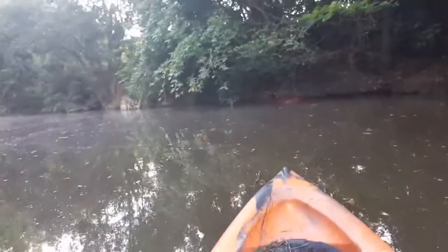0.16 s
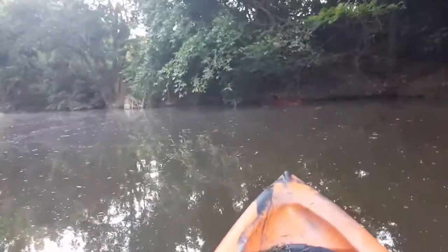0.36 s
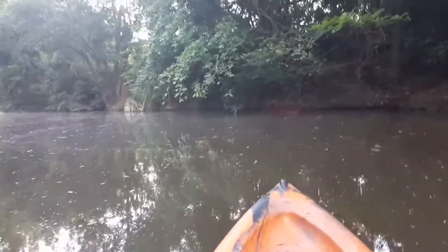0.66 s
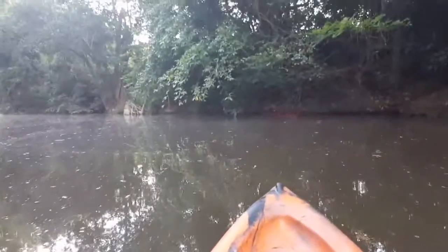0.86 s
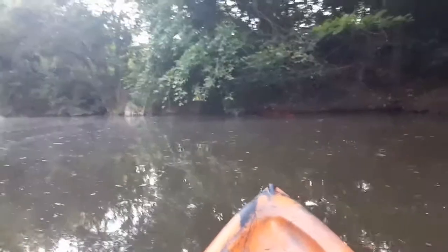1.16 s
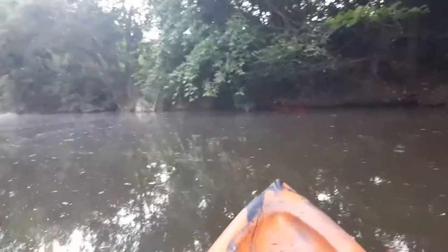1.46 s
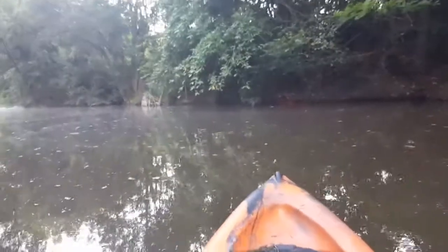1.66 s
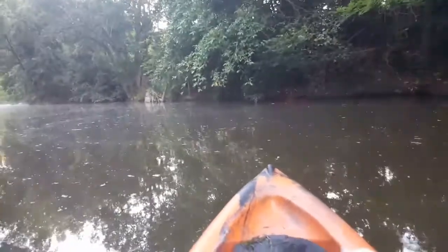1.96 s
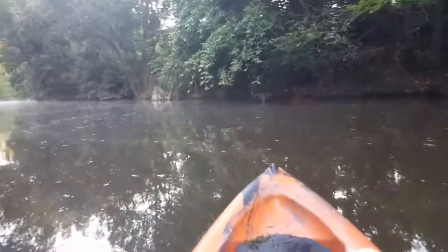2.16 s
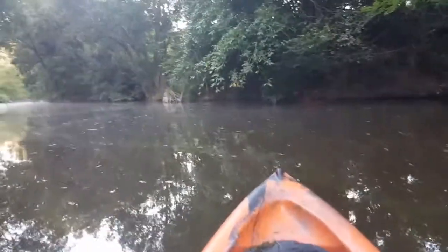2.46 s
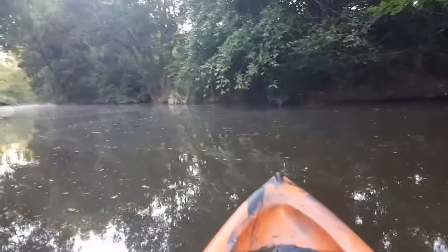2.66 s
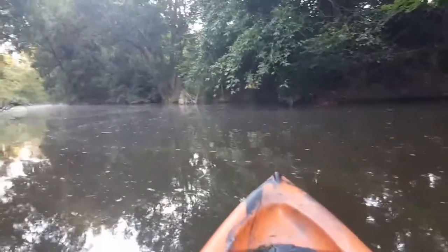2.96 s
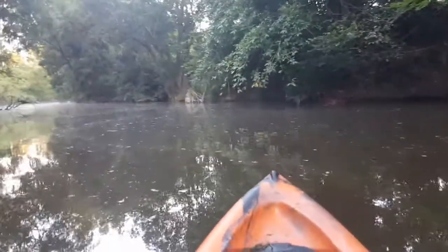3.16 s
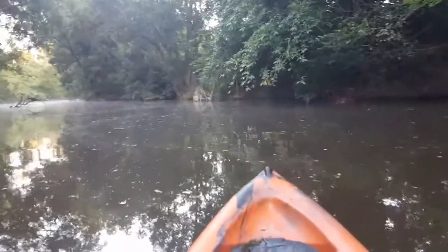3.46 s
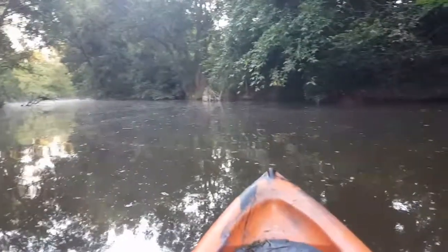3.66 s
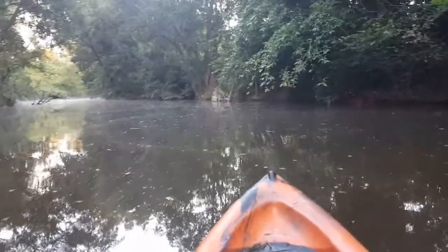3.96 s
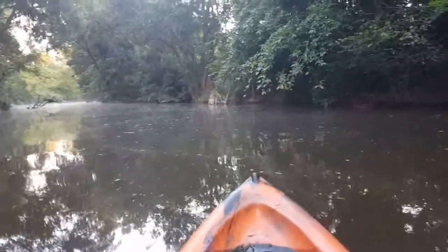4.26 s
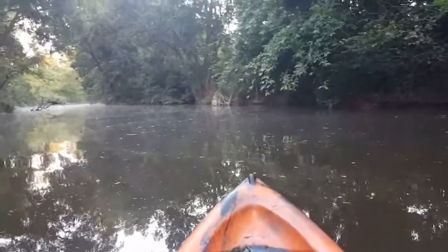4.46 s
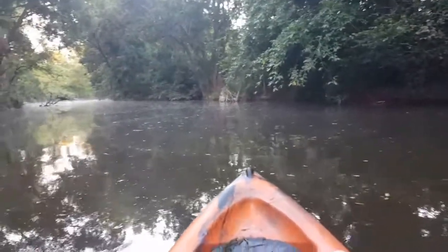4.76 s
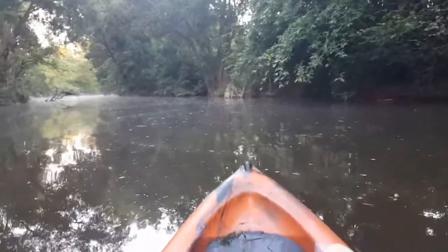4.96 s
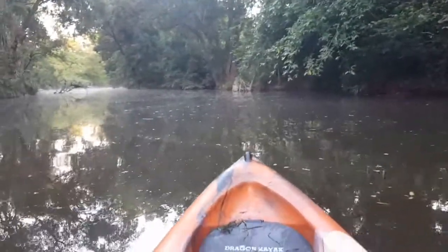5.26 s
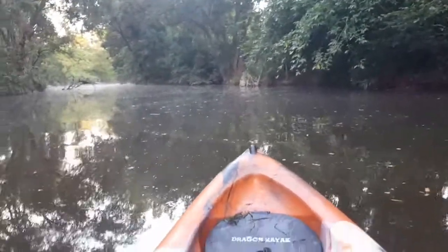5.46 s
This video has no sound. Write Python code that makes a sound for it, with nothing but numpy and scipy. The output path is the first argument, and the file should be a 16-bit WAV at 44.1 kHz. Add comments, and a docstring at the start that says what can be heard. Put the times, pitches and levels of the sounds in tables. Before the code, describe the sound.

A kayak paddle swishes softly through calm water three times, and drips tick and bubble off the lifted blade between strokes. Just before the second stroke, a drop hits the microphone with one loud pop on the left. Thin, distant bird whistles follow, and near the end the blade lightly slaps the surface. The water is close, with faint insects and a low, far rumble behind it.

```python
"""Kayak on a calm wooded river

The hull glides. Each paddle stroke swishes, then the lifted blade sheds drips that tick and bubble;
once it slaps the surface. Far rumble, insects and thin bird whistles fill the air.
One drop strikes the left microphone port with a loud pop."""
import sys
import numpy as np
from scipy import signal
from scipy.fft import rfft, irfft, next_fast_len
from scipy.io import wavfile
from scipy.ndimage import uniform_filter1d, map_coordinates

SR = 44100
rng = np.random.default_rng(int(sys.argv[2]) if len(sys.argv) > 2 else 0)


def log_audio(samples):
    """Write samples as a 16-bit WAV file to the path given in sys.argv[1]."""
    # one column per channel
    frames = np.atleast_2d(samples).T
    # limit to full scale, then quantise
    limited = np.clip(frames, -1, 1)
    pcm = np.round(limited * 32767).astype(np.int16)
    wavfile.write(sys.argv[1], SR, pcm)


N = 246953

# blade pulls: t at full strength/s, hold/s, swish/dB
PULLS = [(0.975, 0.25, -60.5), (2.57, 0.26, -55), (4.488, .13, -54)]
# water off the lifted blade: t at full strength/s, hold/s, swish/dB, spray/dB, hiss/dB
RUNOFF = [(0, 0.098, -58.5, -64.5, -67), (1.654, 0.054, -87, -74.5, -73), (3.027, 0.23, -72.5, -67.5, -72),
          (3.41, 0.025, -74, -67, -61.5), (3.484, 0.095, -77, -67, -72), (4.66, 0.064, -66, -74, -66.5),
          (4.817, 0.018, -58, -64, -60), (3.697, 0.13, -85, -75, -83), (4.05, 0.067, -71, -83, -82),
          (5.202, 0.026, -69, -78.5, -67.5)]
# swish spectrum: f/Hz, relative density/dB
SWISH_SPECTRUM = [(90, -16), (170, 7.5), (330, 0.5), (440, 3), (620, -3.5), (850, -2.5), (2000, -8.5),
                  (2700, -13.5), (3300, -26.5), (6500, -25), (8500, -25.5), (10000, -42.5), (15500, -36)]
# swish width: f/Hz, L-R correlation
SWISH_CORR = [(60, 0.91), (380, 1), (2380, -0.25), (15000, -0.0025)]
# swish position: f/Hz, pan/dB (pan is left minus right throughout)
SWISH_PAN = [(60, -18), (180, 1.5), (550, 0), (1650, 8.5), (4970, 6), (15000, 6)]
# drip bubbles: t/s, level/dB, f/Hz, life/cycles
BUBBLES = [(0.013, -47.5, 840, 38), (.028, -47.5, 1074, 61), (0.031, -51.5, 1570, 57),
           (.045, -57, 1370, 55), (.052, -57, 834, 86), (.06, -53, 407, 25), (.070, -49.5, 828, 66),
           (0.092, -44, 1820, 25), (.092, -44, 2870, 20), (.126, -54.5, 1066, 85), (.128, -46, 2150, 81),
           (.137, -52, 1750, 31), (.157, -54, 1520, 30), (.229, -54, 1980, 11), (0.267, -47.5, 505, 17),
           (.276, -53, 2090, 14), (.398, -60.5, 604, 68), (.527, -61, 588, 30), (1.238, -57, 2900, 16),
           (1.2875, -49.5, 3010, 43), (1.647, -58.5, 1140, 50), (1.659, -56.5, 3340, 68),
           (1.678, -57.5, 1100, 33), (1.819, -63, 1340, 24), (1.905, -62.5, 870, 74),
           (2.832, -48.5, 1810, 52), (2.845, -62, 2150, 570), (2.92, -67.5, 1510, 480),
           (3.017, -48.5, 2700, 30), (3.03, -51, 1080, 82), (3.03, -47, 1370, 27), (3.195, -47.5, 2400, 19),
           (3.198, -54.5, 3590, 130), (3.26, -59, 2090, 93), (3.297, -54, 1790, 24), (3.348, -46, 780, 48),
           (3.375, -54, 669, 83), (3.53, -64, 1190, 17), (3.55, -53, 1340, 28), (3.578, -63.5, 510, 38),
           (3.837, -56, 665, 82), (4.6, -53, 2300, 20), (4.716, -51, 2620, 56), (4.72, -65, 1660, 320),
           (4.783, -51.5, 1430, 8.2), (4.804, -41, 940, 19), (4.803, -49, 1660, 24), (4.805, -46, 387, 18),
           (4.839, -56, 843, 165), (4.927, -54.5, 378, 40), (4.979, -61, 1590, 20), (5.058, -67, 1245, 110),
           (5.167, -58, 1780, 42), (5.32, -60.5, 1210, 100)]
# droplet ticks: t/s, level/dB, f/Hz
TICKS = [(0.017, -51, 7350), (0.0535, -48.5, 6000), (0.0598, -41.5, 7100), (0.092, -49.5, 7900),
         (.127, -51.5, 6260), (.16, -46.5, 7300), (0.1664, -48, 6980), (.2908, -51.5, 7600),
         (0.521, -60, 7260), (1.1438, -55, 7200), (1.287, -54, 6040), (1.6466, -50, 5860),
         (1.6605, -49, 5960), (1.7694, -52, 5960), (1.82, -57.5, 5860), (1.88, -52.5, 8100),
         (1.9014, -53, 8100), (1.9165, -52.5, 8040), (2.999, -53, 4900), (3.029, -55, 7700),
         (3.181, -51.5, 6040), (3.3058, -54, 8230), (3.34, -56, 7200), (3.4236, -47, 7700),
         (3.4593, -49.5, 6950), (3.479, -56, 8250), (3.5627, -57, 6940), (3.755, -65, 6200),
         (3.86, -60, 7400), (4.2134, -54.5, 7160), (4.729, -55, 6050), (4.833, -46.5, 5300),
         (4.836, -42, 7860), (4.9818, -56.5, 5130), (5.199, -53, 6500), (5.324, -57.5, 6770)]
# resizing cavities: t/s, length/s, first f/Hz, last f/Hz, level/dB, crest/fraction of length
GLUGS = [(.13, .11, 400, 640, -60, .6), (.266, .036, 1320, 2000, -56, .2),
         (1.685, .04, 1150, 3000, -55, .85), (2.99, .09, 700, 790, -65, .4),
         (3.04, .06, 1000, 2900, -62, .4), (3.293, .05, 430, 560, -60, .5),
         (3.366, .055, 390, 720, -55, .45), (3.49, .07, 2500, 1500, -59.5, .65)]
# blade slap: t/s, peak/dB, t60/s
SLAP = (4.8032, -46, 0.31)
# jet off the blade: t/s, length/s, first f/Hz, last f/Hz, width/Hz, level/dB
SQUIRT = (3.38, .3, 5500, 2300, 900, -66)
# pressure step at the port: level/dB, low cut/Hz, Q
POP_STEP = (-.2, 104, .68)
# colour of the step's steep but finite rise: f/Hz, gain/dB
POP_EDGE = [(250, 0), (1900, 1.3), (3500, -3.5), (5800, -5), (8600, -19), (12000, -13)]
# bird notes: t/s, length/s, entry f/Hz, held f/Hz, level/dB, fade/(dB/s), blur/rad
WHISTLES = [(2.0, .53, 3430, 3450, -78, -6, .6), (2.56, .22, 3440, 3422, -69.5, -25, .5),
            (2.78, .2, 3422, 3420, -78, 0, .6), (3.385, .23, 5800, 3885, -64.5, 35, 1.1),
            (3.48, .25, 2500, 2335, -60, 45, 1.5)]
# insect bands: f/Hz, half width/Hz, level/dB, pan/dB, swell/dB
INSECT_BANDS = [(1937, 144, -78.5, 3.5, 1.5), (4090, 440, -76, 0.5, 1), (7110, 380, -84.5, 9, 2.5)]
# chorus swell: period/s, first crest/s
INSECT_SWELL = (1.56, .6)
# highest insect band: t/s, added level/dB
SHRILL_BOOST = [(0, 3), (.45, 1), (.85, 1.5), (1.2, 5), (2.8, 1), (3.65, 2.5), (4.1, 4), (5.1, 3),
                (5.6, -4)]
# far rumble: f/Hz, relative density/dB
RUMBLE_SPECTRUM = [(13, -56), (22, -28), (38, -11.5), (62, -5), (91, 3.5), (167, -4.5), (200, -13),
                   (400, -33.5), (520, -46), (880, -120)]
# low drone: t/s, level/dB
DRONE_LEVEL = [(0, -67), (.8, -63.5), (1.5, -63), (1.9, -69), (2.75, -73.5), (3.6, -72.5), (4.5, -63.5),
               (5.6, -70)]
# hush of the air: f/Hz, relative density/dB
AIR_SPECTRUM = [(150, -5.5), (250, -4), (719, -13.5), (1270, -3.5), (1680, -25), (2000, -8), (3420, -9),
                (4140, -35), (5360, -28), (7200, -27), (10500, -21.5), (14600, -18.5), (15700, -29)]
# air width: f/Hz, L-R correlation
AIR_CORR = [(60, 1), (380, -0.96), (2380, -0.32), (15000, -0.07)]
# air position: f/Hz, pan/dB
AIR_PAN = [(60, 11.5), (380, 0.5), (2380, 2.5), (15000, -2)]

PULL_RISE_DB_S, PULL_FALL_DB_S = 101, 138
RUNOFF_RISE_DB_S, RUNOFF_FALL_DB_S = 153, 87
SWISH, SPRAY, HISS = range(3)  # water layers
PULL_OFFSET_DB, GLIDE_DB = (0, -20.5, -13), (-68, -82, -75)  # per layer
SPLAT_DB, SPLAT_LOSS_DB = -7.5, 7  # re a 20-cycle bubble; loss per doubling of life
DRIP_PAN_DB, DRIP_PAN_DB_OCT, DRIP_PAN_SPREAD_DB = 7.5, 7, 10  # pan at 1 kHz, tilt, scatter
WHISTLE_SETTLE_S, WHISTLE_EDGE_S, OFF_NOTE_DB_OCT = .016, .02, 30
RUMBLE_DB, AIR_DB = -61.5, -70
POP_S, TOP_HZ = 2.41655, 15700


def strokes(split_hz=3400):
    """A grainy swish swells with each pull; running water hisses above it."""
    colour = lambda hz: amp(along(SWISH_SPECTRUM, hz))
    body = rush(lambda hz: colour(hz) * (hz < split_hz), SWISH_CORR, SWISH_PAN, patch_db=2, grain_db=1.5)
    hiss = rush(lambda hz: colour(hz) * (hz >= split_hz), SWISH_CORR, SWISH_PAN,
                patch_db=.6, grain_db=1.5)
    flutter = amp(1.1 * wobble(18))
    return flutter * (flow(SWISH) * body + flow(HISS) * hiss)


def flow(layer):
    """Gain of one water layer: hull glide, pulls and runoff, summed in power."""
    t_s, hold_s, db = np.transpose(PULLS)
    pulls = swell_power(t_s, hold_s, db + PULL_OFFSET_DB[layer], PULL_RISE_DB_S, PULL_FALL_DB_S)
    t_s, hold_s, *layer_db = np.transpose(RUNOFF)
    runoff = swell_power(t_s, hold_s, layer_db[layer], RUNOFF_RISE_DB_S, RUNOFF_FALL_DB_S)
    return np.sqrt(amp(GLIDE_DB[layer]) ** 2 + pulls + runoff)


def drips():
    """Larger drops: a noisy splat and a ringing bubble of rising pitch."""
    t_s, db, hz, cycles = np.transpose(BUBBLES)
    pan_db = rng.normal(DRIP_PAN_DB + DRIP_PAN_DB_OCT * np.log2(hz / 1000), DRIP_PAN_SPREAD_DB)
    rings = pings(hz, cycles, rise_oct=.22, attack_cycles=.9, size=SR // 10)
    bubbles = scatter(t_s, rings, db, pan_db) * amp(2.6 * wobble(200))
    impacts = splats(len(t_s), lo_hz=450, hi_hz=2100, t60_s=.05)
    splat_db = db + SPLAT_DB - SPLAT_LOSS_DB * np.log2(cycles / 20)
    return bubbles + scatter(t_s, impacts, splat_db, pan_db)


def ticks():
    """Small drops: a bright ping and a click of noise."""
    t_s, db, hz = np.transpose(TICKS)
    pan_db = rng.normal(10, 3, len(t_s))
    rings = pings(hz, np.full(len(t_s), 25), rise_oct=.034, attack_cycles=1, size=SR // 50)
    clicks = splats(len(t_s), lo_hz=3000, hi_hz=13000, t60_s=.01)
    return scatter(t_s, rings, db, pan_db) + scatter(t_s, clicks, db - 5, pan_db)


def glugs():
    """A cavity shrinks or widens ever faster, so its pitch curls away; its walls tremble."""
    out = np.zeros((2, N))
    tremble = amp(4.5 * wobble(250))
    for t_s, length_s, first_hz, last_hz, db, crest in GLUGS:
        progress = np.linspace(0, 1, int(length_s * SR))
        hz = first_hz * (last_hz / first_hz) ** (progress ** 2.2)
        skew = np.log(.5) / np.log(crest)
        envelope = np.abs(np.sin(np.pi * progress ** skew)) ** .5
        start = round(t_s * SR)
        out[:, start:start + len(hz)] += amp(db) * envelope * np.sin(phase(hz))
    return out * tremble


def spray(count=7000):
    """A dense patter of tiny drops, a few larger than the rest."""
    when, size_rank = rng.random((count, 2)).T
    pitch, life, side = rng.standard_normal((count, 3)).T
    hz = np.clip(1850 * np.exp(.52 * pitch), 550, 9000)
    flow_db = 20 * np.log10(flow(SPRAY))[(when * (N - 1)).astype(int)]
    db = flow_db - 1.5 * np.log(1 - size_rank)
    drops = pings(hz, 20 * np.exp(.4 * life), rise_oct=.3, attack_cycles=1.1, size=SR // 90)
    return scatter(when * N / SR, drops, db, pan_db=5 + 4 * side)


def slap():
    """The blade smacks the surface and the splash dies away."""
    t_s, db, t60_s = SLAP
    smack = splats(1, lo_hz=352, hi_hz=2060, t60_s=t60_s)
    return scatter(np.array([t_s]), smack, np.array([db]), pan_db=np.array([6.5]))


def squirt():
    """A band of hiss slides down as the jet off the blade thins."""
    t_s, length_s, first_hz, last_hz, width_hz, db = SQUIRT
    progress = np.clip((np.arange(N) / SR - t_s) / length_s, 0, 1)
    centre_hz = last_hz + (first_hz - last_hz) * (1 - progress) ** 2
    envelope = np.abs(np.sin(np.pi * progress ** .5))
    fuzz = np.array([wobble(width_hz), wobble(width_hz)])
    return amp(db) * envelope * fuzz * np.sin(phase(centre_hz))


def stray_ticks(count=90):
    """Faint droplets at random, louder where more water runs."""
    when, pitch, size_rank, side = rng.random((count, 4)).T
    hiss_db = 20 * np.log10(flow(HISS))[(when * (N - 1)).astype(int)]
    db = hiss_db + 1 - 2 * np.log(1 - size_rank)
    rings = pings(4500 + 4500 * pitch, np.full(count, 25), rise_oct=.05, attack_cycles=.6, size=SR // 50)
    return scatter(when * N / SR, rings, db, pan_db=16 * side)


def port_pop():
    """A drop seals the left port: a pressure step that the port's low cut swings back."""
    db, cut_hz, q = POP_STEP
    def response(hz):
        jw, w0 = 2j * np.pi * hz, 2 * np.pi * cut_hz
        highpassed_step = jw / (jw ** 2 + jw * w0 / q + w0 ** 2)
        delay = np.exp(-jw * POP_S)
        return SR * amp(db + along(POP_EDGE, hz)) * highpassed_step * delay
    return filtered(signal.unit_impulse(N), response) * [[1], [0]]


def birds():
    """Thin far whistles settle on a held note, blurred by the trees."""
    out = np.zeros((2, N))
    blur = np.array([wobble(60) for _ in range(4)])
    for t_s, length_s, entry_hz, held_hz, db, fade_db_s, blur_rad in WHISTLES:
        t = np.arange(int(length_s * SR)) / SR
        start = round(t_s * SR)
        span = slice(start, start + len(t))
        gate = np.clip(np.minimum(t, length_s - t) / WHISTLE_EDGE_S, 0, 1)
        hz = held_hz + (entry_hz - held_hz) * np.exp(-t / WHISTLE_SETTLE_S)
        level_blur, phase_blur = np.split(blur_rad * blur[:, span], 2)
        off_note_db = OFF_NOTE_DB_OCT * np.abs(np.log2(hz / held_hz))
        level_db = db - fade_db_s * t - off_note_db + 3 * level_blur
        out[:, span] += gate * amp(level_db) * np.sin(phase(hz) + phase_blur)
    return out


def insects():
    """Narrow noise bands of insect song that swell together."""
    period_s, crest_s = INSECT_SWELL
    swell = np.cos(2 * np.pi * (np.arange(N) / SR - crest_s) / period_s)
    out = np.zeros((2, N))
    for centre_hz, half_hz, db, pan_db, swell_db in INSECT_BANDS:
        band = lambda hz: np.exp(-((hz - centre_hz) / half_hz) ** 4)
        song = rush(band, [(centre_hz, 0)], [(centre_hz, pan_db)], patch_db=3, grain_db=1)
        shrill_db = (centre_hz > 5000) * curve(SHRILL_BOOST)
        out += amp(db + swell_db * swell + shrill_db) * song
    return out


def rumble():
    """Far rumble with a narrow drone at 160 Hz."""
    corr = [(60, 1), (300, .91)]
    low = rush(lambda hz: amp(along(RUMBLE_SPECTRUM, hz)), corr, [(60, .34)], patch_db=.5, grain_db=3)
    drone = rush(lambda hz: 1 / (1 + ((hz - 160) / 20) ** 2), corr, [(60, .24)], patch_db=-2, grain_db=0)
    return amp(RUMBLE_DB) * low + amp(curve(DRONE_LEVEL)) * drone


def air():
    """A steady, wide hush."""
    hush = rush(lambda hz: amp(along(AIR_SPECTRUM, hz)), AIR_CORR, AIR_PAN, patch_db=.8, grain_db=.8)
    return amp(AIR_DB) * hush


def rush(gain, corr, pan, patch_db, grain_db):
    """Stereo noise of rms 1, patchy in time and pitch, grainy at millisecond scale."""
    grains = rng.standard_normal((2, N)) * amp(grain_db * wobble(600))
    spectra = signal.stft(grains, nperseg=512)[2]
    patches = uniform_filter1d(rng.standard_normal(spectra.shape[1:]), size=6, axis=0)
    patches = uniform_filter1d(patches, size=10, axis=1)
    pair = signal.istft(spectra * amp(patch_db * unit(patches)), nperseg=512)[1][:, :N]
    angle = lambda hz: np.arccos(np.clip(along(corr, hz), -1, 1)) / 2
    mid, side = filtered(pair, lambda hz: gain(hz) * [np.cos(angle(hz)), np.sin(angle(hz))])
    return unit(filtered(np.array([mid + side, mid - side]), lambda hz: sides(along(pan, hz))))


def pings(hz, cycles, rise_oct, attack_cycles, size):
    """Damped sines that climb in pitch as they fall 60 dB in cycles / hz seconds."""
    hz, cycles = hz[:, None], cycles[:, None]
    age = np.arange(size) / SR * hz / cycles
    rising_hz = np.minimum(hz * 2 ** (rise_oct * np.minimum(age, 1)), SR / 3)
    attack = 1 - np.exp(-age * cycles / attack_cycles)
    return np.sin(phase(rising_hz)) * amp(-60 * age) * attack


def splats(count, lo_hz, hi_hz, t60_s):
    """Puffs of band noise with a sudden start."""
    t = np.arange(SR // 12) / SR
    band = signal.butter(3, [lo_hz, hi_hz], "bandpass", fs=SR, output="sos")
    return signal.sosfilt(band, rng.standard_normal((count, len(t))) * amp(-60 * t / t60_s))


def scatter(t_s, waves, db, pan_db):
    """Short waves, peak-normalised, then scaled, panned and placed in time."""
    waves = waves / np.abs(waves).max(axis=1, keepdims=True)
    index = np.round(t_s * SR).astype(int)[:, None] + np.arange(waves.shape[1])
    channels = [waves * gain[:, None] for gain in amp(db) * sides(pan_db)]
    return np.array([np.bincount(index.ravel(), x.ravel(), N + SR)[:N] for x in channels])


def swell_power(t_s, hold_s, db, rise_db_s, fall_db_s):
    """Summed power of events that rise, hold and fall linearly in dB."""
    grid = np.arange(0, N, 32)
    age_s = grid / SR - t_s[:, None]
    loss_db = rise_db_s * np.maximum(-age_s, 0) + fall_db_s * np.maximum(age_s - hold_s[:, None], 0)
    power = np.sum(amp(db[:, None] - loss_db) ** 2, axis=0)
    return np.interp(np.arange(N), grid, power)


def amp(db):
    """dB to gain."""
    return 10 ** (np.asarray(db) / 20)


def unit(x):
    """Scaled to rms 1."""
    return x / np.sqrt(np.mean(x ** 2) + 1e-20)


def sides(pan_db):
    """Left and right gains."""
    return amp([pan_db / 2, -pan_db / 2])


def phase(hz):
    """Running phase in rad."""
    return 2 * np.pi * np.cumsum(hz, axis=-1) / SR


def along(points, hz):
    """(f/Hz, value) points read on a log axis."""
    knots_hz, values = np.transpose(points)
    return np.interp(np.log(hz + 1), np.log(knots_hz + 1), values)


def curve(points):
    """(t/s, value) points read at each sample."""
    return np.interp(np.arange(N) / SR, *np.transpose(points))


def wobble(rate_hz):
    """Smooth random curve with knots at rate_hz."""
    knots = rng.standard_normal(int(N * rate_hz / SR) + 4)
    return map_coordinates(knots, [np.arange(N) * rate_hz / SR])


def filtered(x, response):
    """x through a complex frequency response."""
    size = next_fast_len(N + SR // 2)
    return irfft(rfft(x, size) * response(np.fft.rfftfreq(size, 1 / SR)), size)[..., :N]


def scene():
    """All sources, in stereo."""
    water = strokes() + drips() + ticks() + glugs() + spray() + slap() + squirt() + stray_ticks()
    return water + port_pop() + birds() + rumble() + air() + insects()


def record(dry):
    """Brick-wall low-pass."""
    return filtered(dry, lambda hz: hz < TOP_HZ)


dry = scene()
out = record(dry)
log_audio(out)
```